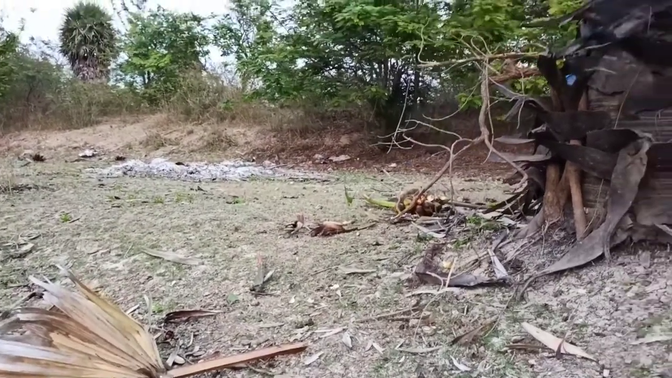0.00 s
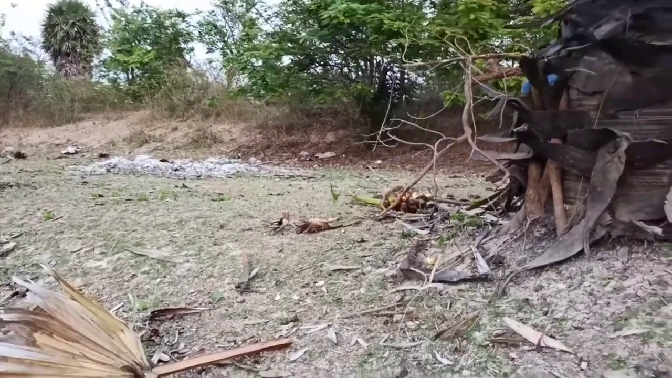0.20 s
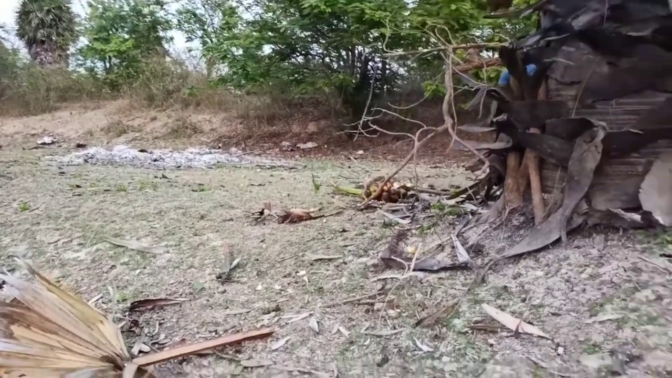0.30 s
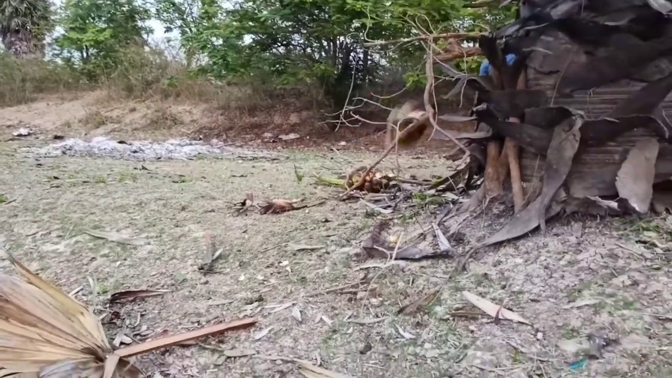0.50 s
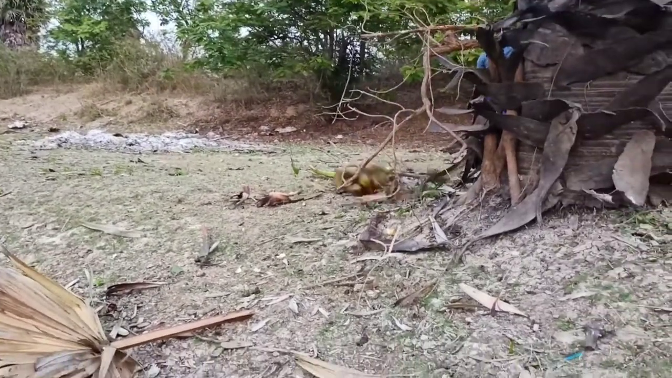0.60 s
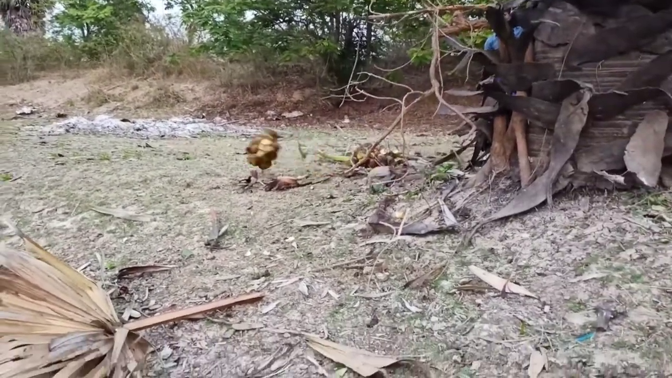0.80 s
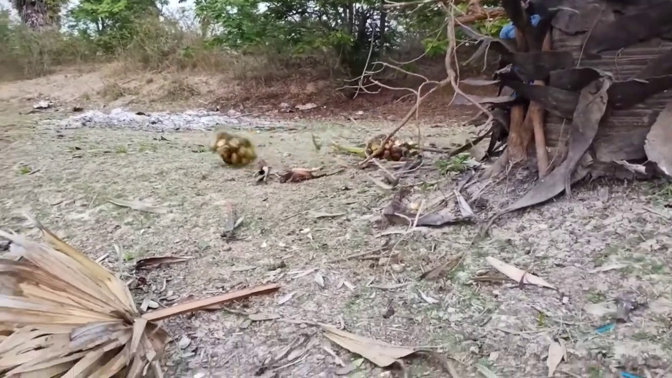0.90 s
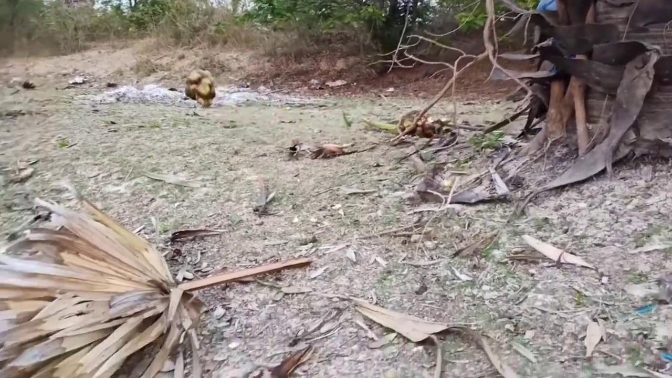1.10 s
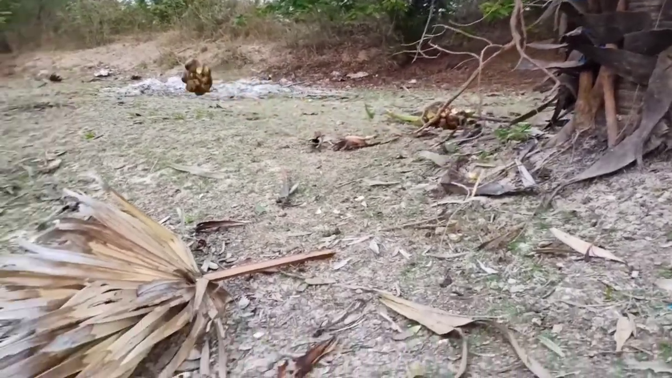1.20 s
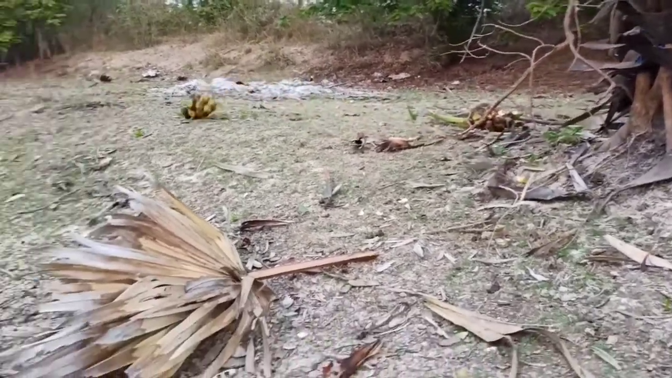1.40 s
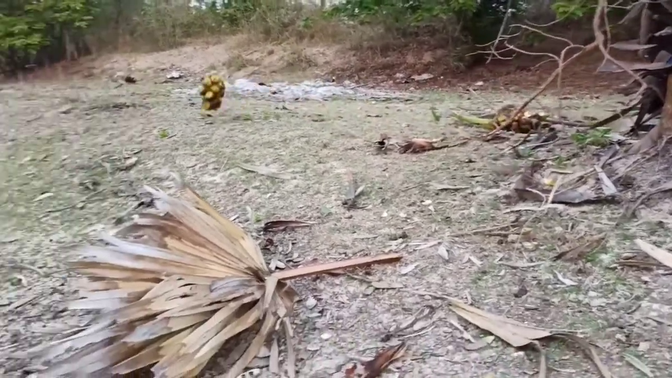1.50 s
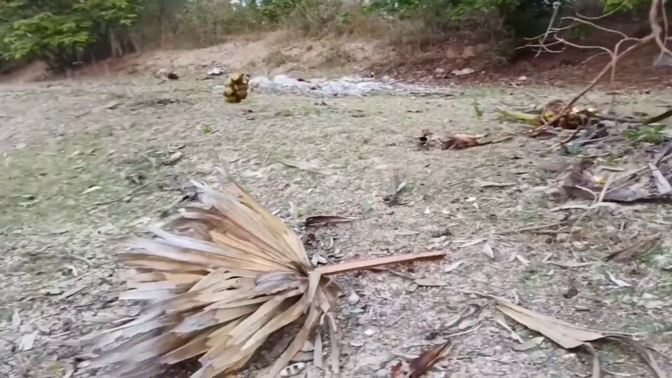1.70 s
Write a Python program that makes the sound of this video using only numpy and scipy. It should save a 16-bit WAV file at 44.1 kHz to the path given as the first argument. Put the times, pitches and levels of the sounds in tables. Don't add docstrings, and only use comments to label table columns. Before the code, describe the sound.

After a brief near-silence, a fruit cluster crashes into dry leaves and woody stalks, snapping and rattling, strikes again, then tumbles away with soft thuds and scattered crackles outdoors, dry phone pickup with little bass.

```python
import sys
import numpy as np
from scipy import signal
from scipy.fft import rfft, irfft
from scipy.io import wavfile
from scipy.ndimage import uniform_filter1d

SR = 44100
rng = np.random.default_rng(int(sys.argv[2]) if len(sys.argv) > 2 else 0)


def field_ratio(decibels):
    return 10 ** (np.asarray(decibels, dtype=float) / 20)


def wav_out(sig):
    wavfile.write(sys.argv[1], SR, np.round(np.clip(np.atleast_2d(sig).T, -1, 1) * 32767).astype(np.int16))


N = 79380
T = np.arange(N) / SR

# frequency in Hz, level in dB per Hz.
LEAF_TONE = [(400, -1.5), (800, 1), (1500, 3), (3000, 2), (6400, 6.5), (7700, 2), (9200, -10),
             (15500, -9.5)]
STRIKE_LEAD_S = 0.003
KNOCK_GAIN_DB, THUD_GAIN_DB, CRACK_GAIN_DB = -4.5, -4, -8.5
GRAIN_SPREAD_DB = 1.7


def unit(x):
    return x / np.sqrt(np.mean(x ** 2))


def curve(table, column=1):
    points = np.array(table)
    return np.interp(T, points[:, 0], points[:, column], left=-120)


def band(x, hz, width):
    return signal.lfilter(*signal.iirpeak(min(hz, 15000), hz / width, fs=SR), x)


def colour(x, points):
    points, size = np.array(points), 2048
    hz = np.maximum(np.arange(size // 2 + 1) * SR / size, 1)
    db = np.interp(np.log(hz), np.log(points[:, 0]), points[:, 1])
    cepstrum = irfft(db * np.log(10) / 20)
    cepstrum[1:size // 2] *= 2
    cepstrum[size // 2 + 1:] = 0
    response = irfft(np.exp(rfft(cepstrum)))
    return signal.fftconvolve(x, response)[:len(x)]


def walk(rate):
    hold = int(SR / rate)
    steps = np.repeat(rng.standard_normal(N // hold + 1), hold)
    return unit(uniform_filter1d(steps, hold)[:N])


def grains(rate, spread_db):
    size = field_ratio(spread_db * rng.exponential(size=N))
    happens = rng.random(N) < rate / SR
    return unit(happens * size * rng.standard_normal(N))


def add(out, s, x):
    i = int(s * SR)
    out[i:i + len(x)] += x[:N - i]


def ring(hz, t60, cycles, sag):
    t = np.arange(int(SR * 0.3)) / SR
    push = (1 - np.exp(-t * hz / cycles)) ** 3
    env = push * 1000. ** (-t / t60)
    bent_time = t - sag * (t - t60 * (1 - np.exp(-t / t60)))
    return env / env.max() * np.sin(2 * np.pi * hz * bent_time)


def resonate(x, modes):
    return unit(sum(field_ratio(db) * band(band(x, hz, width), hz, 2 * width) for hz, width, db in modes))


def air():
    # frequency in Hz, level in dB per Hz.
    field_tone = [(18, -56), (30, -22), (165, -1), (404, -13.5), (499, -7.5), (822, -13), (1010, -18.5),
                  (7090, -23.5), (16000, -53)]
    field = unit(colour(rng.standard_normal(N), field_tone)) * field_ratio(-60.5 + 0.17 * walk(22.0))
    insect_hz, insect_width_hz, insect_db = 7200, 1300, -69
    insects = band(rng.standard_normal(N), insect_hz, insect_width_hz)
    insects = unit(band(insects, insect_hz, insect_width_hz))
    earlier = unit(colour(grains(2800, 0.72), LEAF_TONE)) * field_ratio(-51.0) * np.exp(-T / 0.017)
    return field + field_ratio(insect_db) * insects + earlier


def rolling():
    # time in seconds, level in dB.
    load = [(.16, -50), (.28, -42), (.58, -46), (.62, -38.5), (.68, -30), (.78, -44.5), (.84, -39),
            (.95, -38.5), (1.1, -40), (1.2, -43.5), (1.27, -44.5), (1.45, -48.5), (1.52, -39.5), (1.6, -50),
            (1.8, -52)]
    # frequency in Hz, width in Hz, level in dB.
    soil_modes = [(70, 50, 2), (106, 57, 2.5), (167.6, 136, -3.5)]
    return field_ratio(curve(load) + 0.5) * resonate(grains(2000, 1.0), soil_modes)


def rustle():
    # time in seconds, rustle level in dB.
    crush = [(.165, -62), (.205, -35.5), (.285, -29.5), (.33, -43), (.355, -22), (.46, -23), (.51, -35),
             (.6, -40.5), (.655, -41.5), (.685, -19), (.76, -35.5), (.84, -38.5), (.94, -39), (1.01, -40),
             (1.07, -41.5), (1.2, -43), (1.6, -46), (1.8, -60)]
    grains_per_s, together, hiss = 700, 0.74, 1.1
    flicker_db, patchy_db, drift_db = 1, 2.5, 2.24
    common, shared = grains(4000, GRAIN_SPREAD_DB), walk(44.5)
    out = np.zeros(N)
    for hz in 500. * 2 ** np.arange(0, 5.1, 1 / 3):
        crowd = grains(grains_per_s, GRAIN_SPREAD_DB) + together * common + hiss * rng.standard_normal(N)
        crowd = band(band(crowd, hz, hz * 0.53), hz, hz * 0.58)
        level_db = flicker_db * shared + patchy_db * walk(69.0) + drift_db * walk(11.69)
        out += crowd * field_ratio(level_db)
    return field_ratio(curve(crush)) * unit(colour(out, LEAF_TONE))


def rattle():
    # time in seconds, level in dB.
    shake = [
        (.165, -60),
        (.18, -37),
        (.29, -26.5),
        (.33, -36.5),
        (.36, -23),
        (.45, -20),
        (.6, -51.5),
    ]
    # frequency in Hz, width in Hz, level in dB.
    stalk_modes = [(385, 78, 3), (506.5, 89, 3.5), (571, 30, 0), (713, 340, -8.5), (202, 92, -8.5)]
    shaking = T < shake[-1][0]
    return field_ratio(curve(shake) + 1.0) * shaking * resonate(grains(500, 4.03), stalk_modes)


def knocks():
    # time in seconds, peak in dB, pitch in Hz, ring t60 in seconds.
    blows = [(0.173, -27, 401, 0.043), (0.205, -30, 875, 0.079), (0.261, -14, 433.4, 0.15),
             (0.268, -9.5, 348, 0.066), (0.285, -13, 392, 0.021), (0.338, -1, 385, 0.066),
             (0.373, -21, 427, 0.14), (0.398, -9, 458, 0.046), (0.415, -8, 412, 0.047),
             (0.431, -13.5, 491.4, 0.074), (0.446, -5, 730, 0.022), (0.458, -13.5, 368, 0.035),
             (0.499, -23, 415, 0.042), (0.604, -21, 704, 0.025), (0.683, -14, 607, 0.0081),
             (0.853, -31, 835, 0.073), (0.339, -17, 725, 0.061), (1.165, -32.5, 385, 0.054),
             (0.671, -26, 366, 0.03), (0.706, -28.5, 395, 0.024), (0.42, -8, 557, 0.042),
             (0.435, -16, 584, 0.037), (0.6837, -22, 298, 0.025)]
    # ratio to the pitch, level in dB.
    overtones = [(.55, -19), (2.1, -12), (3.3, -14)]
    # time in seconds, peak in dB, pitch in Hz, ring t60 in seconds.
    presses = [
        (0.2385, 2, 401, 0.015),
        (0.2375, -9, 836, 0.012),
    ]
    out = np.zeros(N)
    for s, db, hz, t60 in blows:
        x = ring(hz, t60, 1.67, 0.022)
        for ratio, overtone_db in overtones:
            x = x + field_ratio(overtone_db) * ring(hz * ratio, t60 / max(ratio, 1), 2.1, 0)
        add(out, s - STRIKE_LEAD_S, field_ratio(db + KNOCK_GAIN_DB) * x)
    for s, db, hz, t60 in presses:
        add(out, s - STRIKE_LEAD_S, field_ratio(db + KNOCK_GAIN_DB) * ring(hz, t60, 7, 0))
    return out


def splinters(hz, length, body_db, sudden):
    size = 6000
    t = np.arange(size) / SR
    u = t / length
    if sudden:
        rise_s, splinter_db = 0.00012, 1.5
        burst = (1 - np.exp(-t / rise_s)) * np.exp(-u)
    else:
        swell, splinter_db = 0.85, 3
        burst = (u * np.exp(1 - u)) ** swell
    tail = field_ratio(-23) * np.minimum(u, 1) * 1000. ** (-t / 0.06)
    noise, rough = rng.standard_normal((2, size))
    x = (burst + tail) * noise * field_ratio(splinter_db * unit(uniform_filter1d(rough, size=24)))
    if sudden:
        x[3] += 7

    leaf = colour(x, LEAF_TONE)
    edge = max(2560, 0.75 * hz)
    low = signal.lfilter(*signal.butter(4, edge, "low", fs=SR), leaf)
    high = signal.lfilter(*signal.butter(4, edge, "high", fs=SR), leaf)
    leaf = high + field_ratio(body_db) * low
    ribs = sum(band(leaf, hz * 2 ** octaves, 260) for octaves in rng.uniform(-1.163, 1, size=3))
    own = band(x, hz, hz * 0.09)
    x = leaf / leaf.std() + field_ratio(-0.5) * own / own.std() + field_ratio(-2) * ribs / leaf.std()
    return x / np.sqrt(uniform_filter1d(x ** 2, size=88).max())


def breaks(rows, sudden=False):
    out = np.zeros(N)
    for s, db, hz, length, body_db in rows:
        lead = 0 if sudden else 0.416 * length
        add(out, s - lead, field_ratio(db + CRACK_GAIN_DB) * splinters(hz, length, body_db, sudden))
    return out


def cracks():
    # time in seconds, peak in dB, colour in Hz, length in seconds, body in dB.
    falling = [(0.2004, -21, 2820, 0.0081, -1), (0.2368, -18.5, 1790, 0.0042, -25),
               (0.2735, -5, 5640, 0.0011, -7.5), (0.3472, -2, 2620, 0.0013, -2),
               (0.364, -18, 6700, 0.0015, -8), (0.3954, -15, 4620, 0.0025, 13),
               (0.410, -6, 6700, 0.0019, -5), (0.436, -6, 3840, 0.0024, -3),
               (0.446, -5.5, 1655, 0.0023, -3), (0.458, -10, 6400, 0.0024, 7),
               (0.53, -24, 6740, 0.0018, -18), (0.602, -13.5, 2130, 0.0027, 6),
               (0.6228, -15, 6150, 0.0032, -3), (0.6395, -14.5, 5240, 0.0021, -4),
               (0.6655, -19, 5240, 0.0017, -3), (0.678, -9, 6600, 0.0011, -2), (0.692, -6, 6200, 0.0017, 3),
               (0.71, -25, 6200, 0.003, 13), (0.749, -11.5, 6640, 0.0022, 21),
               (0.754, -16.5, 1620, 0.0024, 0)]
    return breaks(falling)


def thuds():
    # time in seconds, peak in dB, pitch in Hz, t60 in seconds.
    hits = [(0.259, -13.5, 312, 0.17), (0.275, -10.5, 170, 0.027), (0.345, -22, 212, 0.059),
            (0.617, -19, 110, 0.017), (0.671, -26, 137, 0.096), (0.702, -28, 84, 0.12),
            (0.743, -10.5, 225, 0.035), (0.755, -15.5, 214, 0.018), (0.873, -15, 120, 0.049),
            (0.89, -15, 98, 0.089), (0.956, -23, 112, 0.074), (1.044, -13.5, 193, 0.026),
            (1.053, -15.5, 75, 0.11), (1.126, -25, 110, 0.35), (1.166, -23.5, 70.0, 0.14),
            (1.506, -24, 277, 0.065), (1.529, -29, 76.6, 0.066), (0.822, -22, 95, 0.099),
            (0.93, -23, 65, 0.1), (0.985, -27.5, 101, 0.07)]
    out = np.zeros(N)
    for s, db, hz, t60 in hits:
        add(out, s, field_ratio(db + THUD_GAIN_DB) * ring(hz, t60, 0.11, 0.12))
    return out


def snaps():
    # time in seconds, peak in dB, colour in Hz, length in seconds, body in dB.
    snapping = [(0.2714, 2.5, 6900, 0.00081, -3), (0.3686, 2, 7560, 0.0019, -3),
                (0.4125, -3, 2360, 0.0022, 16), (0.4463, -12, 6600, 0.0015, -6),
                (0.5256, -14, 6200, .003, -20), (0.6425, -14, 5700, 0.0029, 3),
                (0.6824, 2, 4460, 0.0051, -5), (1.2957, -6, 6900, 0.0025, -5),
                (1.4511, -11, 6000, 0.0012, -16), (1.5922, -13, 3050, 0.0031, -1.5),
                (1.6972, -22, 5900, 0.00089, 10), (1.2383, -12.5, 5600, 0.0026, 0.5),
                (1.082, -21, 7300, 0.0013, 0), (1.5655, -33, 4650, 0.0013, 4)]
    return breaks(snapping, sudden=True)


def more_cracks():
    # time in seconds, peak in dB, colour in Hz, length in seconds, body in dB.
    more = [(0.377, -4, 6400, .0015, 0), (0.401, -11.5, 3840, 0.00314, -6),
            (0.559, -30, 6850, 0.0033, -16), (0.672, -15.5, 5500, 0.0027, 3),
            (0.7015, -22, 1480, 0.0015, 6), (0.7155, -17, 6430, .002, 7),
            (1.0505, -14.5, 5140, 0.0024, 16), (1.0545, -16.5, 4300, 0.0024, 23),
            (1.0625, -23, 5500, 0.0009, 19), (1.089, -26, 6360, 0.00304, -5),
            (1.115, -24, 6200, 0.0039, -21), (1.366, -25.5, 6860, 0.0028, 6),
            (1.512, -13, 4300, 0.0014, 31), (1.5255, -26, 5370, 0.0011, 3), (0.777, -27, 6100, 0.0042, -3),
            (0.803, -29, 5860, 0.0028, -19), (0.943, -13, 5300, 0.0011, -3),
            (1.157, -23, 7000, 0.0012, -6), (1.232, -30, 7050, .002, -12), (0.349, -8, 1360, 0.0014, 16),
            (0.49, -20.5, 3100, 0.0031, -2), (1.062, -20.5, 1830, 0.0025, -1)]
    return breaks(more)


def bounces():
    # time in seconds, peak in dB, colour in Hz, length in seconds, body in dB.
    leaving = [(0.876, -21.5, 5370, 0.0064, -1), (0.8994, -19.5, 4250, 0.0028, -7),
               (0.917, -16, 5100, 0.0039, -2), (0.933, -19.5, 2390, 0.0023, -2.5),
               (0.95, -11, 3600, 0.0014, 3), (0.9896, -21, 4500, 0.003, 7),
               (1.0315, -17.5, 4240, 0.0028, 22), (1.0453, -14, 1560, 0.0016, -4),
               (1.074, -13, 6500, 0.0026, -2), (1.1273, -22.5, 3890, 0.0078, 1),
               (1.163, -14, 2560, 0.0025, -34), (1.2415, -19, 5540, 0.0021, -14),
               (1.297, -8.5, 7700, 0.001, -1), (1.3607, -26, 7530, 0.0066, 1),
               (1.4228, -22.5, 5600, 0.0015, 11), (1.459, -30, 5570, 0.00033, 1),
               (1.4997, -15.5, 5320, 0.0029, 4), (1.504, -15.5, 2050, 0.0027, -24),
               (1.5173, -19, 1460, 0.0042, 5.5), (1.594, -14.5, 5500, 0.00094, 6),
               (1.6213, -23.5, 3520, 0.0028, 9), (1.6368, -21, 3570, 0.0033, 6),
               (1.697, -31, 5500, 0.0041, 28)]
    return breaks(leaving)


def scene():
    background = air() + rolling()
    fronds = rustle() + rattle() + knocks() + cracks() + snaps() + more_cracks()
    ground = thuds() + bounces()
    return (background + fronds + ground)[None]


def roll_off(x):
    return signal.sosfilt(signal.butter(12, 16480, fs=SR, output="sos"), x)


def record(dry):
    low_cut = signal.butter(3, 60.3, "high", fs=SR, output="sos")
    top_cut = signal.ellip(8, 0.2, 50, 15600, fs=SR, output="sos")
    x = signal.sosfilt(low_cut, dry)
    x = x - 0.43 * band(x, 1025, 240)
    rounded = np.tanh(0.8 * x) / 0.78
    mix = signal.sosfilt(top_cut, rounded)
    return roll_off(mix)


dry = scene()
out = record(dry)
wav_out(out)
```